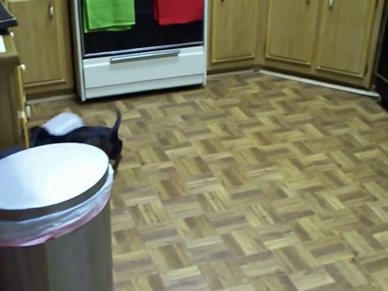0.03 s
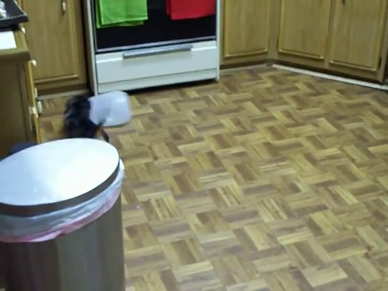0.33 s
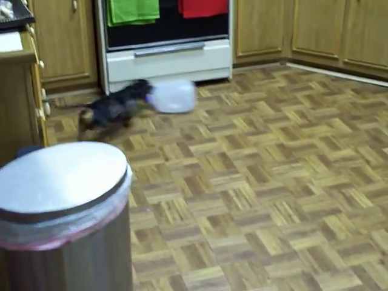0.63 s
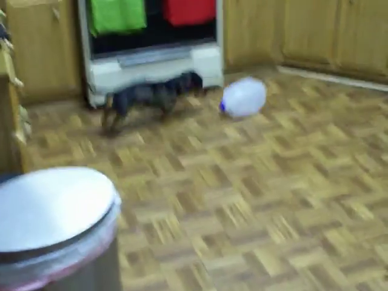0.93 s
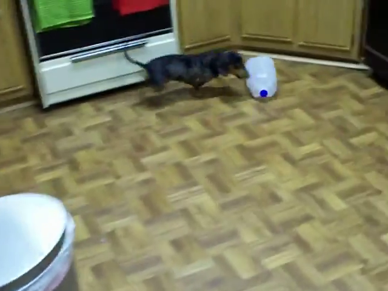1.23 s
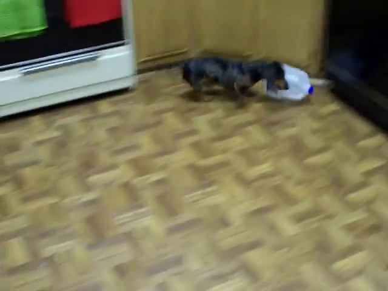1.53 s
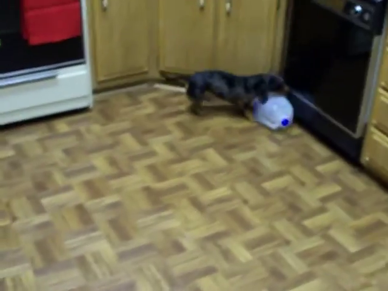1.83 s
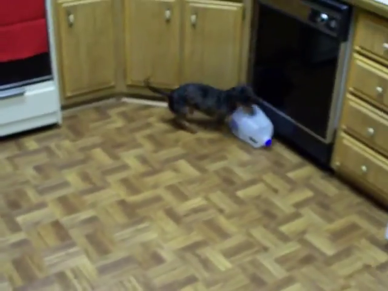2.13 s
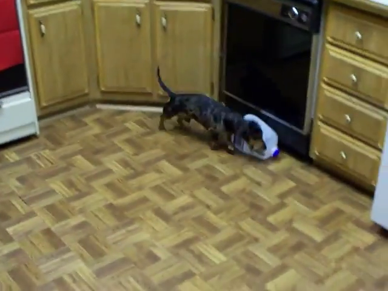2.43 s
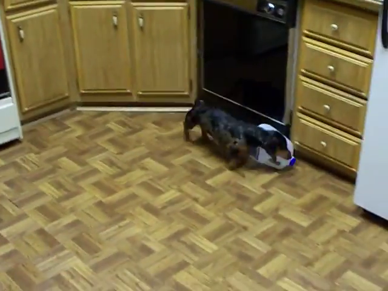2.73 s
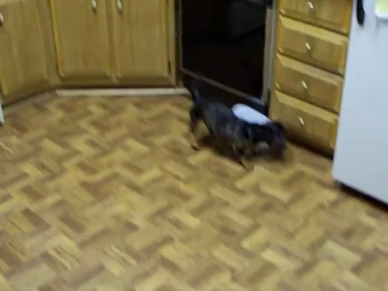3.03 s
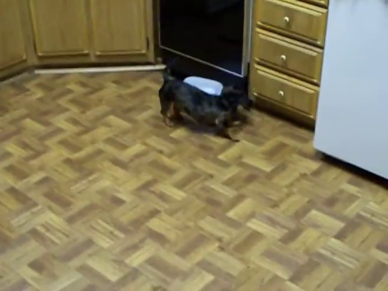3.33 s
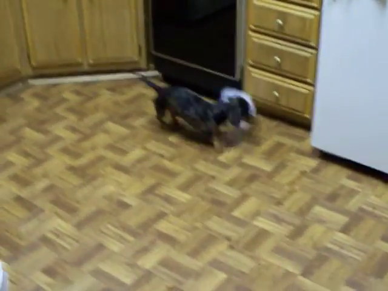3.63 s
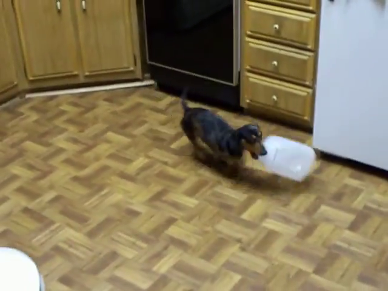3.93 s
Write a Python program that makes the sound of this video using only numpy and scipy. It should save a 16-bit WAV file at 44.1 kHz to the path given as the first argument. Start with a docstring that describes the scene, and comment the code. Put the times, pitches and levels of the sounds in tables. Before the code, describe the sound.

An empty plastic jug scrapes and rattles across a hard kitchen floor throughout, with a small dog's claws ticking lightly. Lighter knocks in the first second give way to sharper, crackly clacks from 1.3 to 1.8 seconds. After a brief lull, scraping and knocking pick up from 2.1 seconds, with deeper hollow thumps near 3.2 and 3.6 seconds, then fade by 4. The room adds a short echo.

```python
"""A kitchen with a hard floor: a small dog noses an empty plastic jug across it.
The jug slides in stick-slip shoves, tumbles and knocks against the cabinets.
Its hollow body booms; its thin walls clack and crackle. Claws tick on the floor.
The room adds faint noise and a short bright tail."""
import sys
import numpy as np
from scipy import signal
from scipy.io import wavfile

SR = 44100
rng = np.random.default_rng(int(sys.argv[2]) if len(sys.argv) > 2 else 0)


def transcribe(u):
    """Save the signal u as a 16-bit wav file named by the first command-line argument.

    u: samples, shape (n,) or (channels, n), limited to [-1, 1]; the rate is SR.
    q: integer samples, one column per channel.
    """
    v = np.clip(np.atleast_2d(u).T, -1, 1)
    q = np.round(v * 32767).astype(np.int16)
    wavfile.write(sys.argv[1], SR, q)


N = 176400
TIME_S = np.arange(N) / SR

# Room decay: f/Hz, t60/s
ROOM_DECAY = [(150, 0.19), (500, 0.55), (1400, 0.49), (3500, 0.2), (8000, 0.29)]
# Spectral shapes: f/Hz, relative level/dB
AIR_EQ = [(20, -18), (60, -14.5), (100, -4.5), (170, 2.5), (320, -2), (1600, -18.5), (3100, -7.5),
          (7300, -14.5), (9000, -34.5)]  # room noise
BODY_EQ = [(25, -56), (60, -40), (110, -37), (165, -14), (240, -4.5), (360, 2), (470, -11.5), (680, -9),
           (1500, -52.5)]  # hollow body
CLACK_EQ = [(150, -30.5), (450, -6.5), (650, 5), (1200, 3.5), (1750, 1.5), (2150, -7), (2900, -14),
            (4200, -21.5), (8000, -39.5)]  # struck wall
RASP_EQ = [(150, -30.5), (470, -5.5), (660, 4), (1250, 1.5), (1750, 0), (2150, -7.5), (2800, -11),
           (4200, -20.5), (8000, -39)]  # rubbed wall
CRACK_EQ = [(500, -30), (2000, 9.5), (3200, -0.5), (5200, -1.5), (6400, -0.5), (7400, 3.5), (8200, -4),
            (9000, -27)]  # sharp contact
HISS_EQ = [(500, -21.5), (2000, 10), (3200, 2), (5200, -1.5), (6400, 1), (7400, 5), (8200, -6), (9000, -21)]  # fine friction
MIC_EQ = [(20, 0.5), (2400, -2.5), (2900, 1), (3400, -4.5), (3800, -8.5), (4050, -15.5), (4200, -25.5),
          (4400, -13), (4700, -4.5), (5200, 1), (6000, 3.5), (9000, 1)]  # microphone
# Claw ticks: t/s, level/dB
CLAW_TICKS = [(0.226, -35.5), (0.376, -37.5), (0.671, -35.5), (0.907, -34.5), (.96, -38), (1.116, -40),
              (1.278, -37), (1.434, -33.5), (1.565, -30), (1.791, -31.5), (2.142, -46), (2.646, -28),
              (2.848, -37), (2.866, -37), (2.904, -34), (3.294, -45.5), (3.406, -39.5), (3.699, -39),
              (3.789, -36), (3.888, -48)]
# Jug modes: f/Hz, level/dB, t60/s before added damping
JUG_MODES = [(194.4, -17, 0.65), (230.5, -4, 0.23), (261.4, -0.5, 0.49), (323, -6.5, 0.17),
             (357.4, -3.5, 0.3), (386.7, 2, 0.34), (439, -2, 0.18), (548.3, -2.5, 0.22),
             (603.7, -5.5, 0.27), (711, -10, 0.41), (963, -16, 0.18), (1210, -25.5, 0.6),
             (1650, -17.5, 0.12)]
# Light sliding: t/s, rumble level/dB, rasp level/dB, hiss level/dB
LIGHT_SLIDE = [(0., -28.5, -29.5, -42.5), (.3, -46, -32.5, -42), (.42, -37, -36, -42.5),
               (.59, -50, -34, -41.5), (.72, -38, -35, -47), (.87, -49, -36.5, -43.5),
               (.96, -43.5, -41, -45), (1.1, -41, -34, -42.5), (1.2, -33, -33, -50),
               (1.32, -44, -33, -38.5), (1.52, -34.5, -34, -40.5), (1.86, -46.5, -37, -46.5),
               (1.95, -40, -34, -41.5), (2.0, -49, -52, -56), (2.08, -45, -38, -59),
               (2.18, -43, -38.5, -46), (2.26, -34.5, -42.5, -43.5), (2.46, -42, -31.5, -42),
               (2.55, -39.5, -34.5, -41.5), (2.86, -35.5, -48, -48), (3.08, -43.5, -37.5, -49),
               (3.15, -40.5, -40, -41.5), (3.37, -54, -51, -69), (3.48, -48, -46, -60),
               (3.6, -36.5, -36.5, -36), (3.76, -52, -50, -64), (3.86, -61, -58.5, -63),
               (4., -54, -44.5, -59)]
# Shoves: t/s, length/s, rumble level/dB, rasp level/dB, hiss level/dB, note f/Hz, note level/dB
JUG_SHOVES = [(0.008, 0.18, -37.5, -33, -66, 701, -36), (0.21, 0.14, -36.5, -34, -60, 690, -38),
              (0.612, 0.079, -53, -33, -39.5, 1568, -32.5), (0.743, 0.097, -37, -30.5, -42.5, 1241, -29.5),
              (0.983, 0.048, -57, -42, -38.5, 1725, -39), (1.333, 0.071, -37, -23.5, -36.5, 265, -26.5),
              (1.549, 0.021, -21, -19, -49.5, 536, -27), (1.66, 0.12, -36, -41, -38, 965, -36),
              (2.114, 0.1, -39.5, -32.5, -41, 385, -40.5), (2.269, 0.066, -39.5, -31, -32.5, 965, -37),
              (2.561, 0.13, -42.5, -24.5, -32.5, 1648, -31), (2.622, 0.12, -28.5, -23.5, -51.5, 1170, -44),
              (2.754, 0.074, -40, -29.5, -52, 259, -37), (2.946, 0.077, -32, -38, -55, 382.4, -27),
              (3.174, 0.079, -28, -39.5, -47.5, 354, -29.5), (3.243, 0.065, -33.5, -39, -51, 337, -41),
              (3.401, 0.047, -59, -36.5, -39.5, 1062, -43), (3.626, 0.063, -29.5, -48, -51, 424, -30.5),
              (3.764, 0.058, -54, -49.5, -41.5, 1900, -60)]
# Knocks: t/s, boom level/dB, clack level/dB, crack level/dB, body f/Hz, wall f/Hz, contact/s
JUG_KNOCKS = [(.078, -37, -27.5, -50, 394, 880, .012), (0.11, -34, -29.5, -59, 370, 655, 0.011),
              (.134, -27, -28.5, -55.5, 377, 646, 0.0066), (.178, -33.5, -31.5, -55, 390, 1290, 0.0066),
              (0.651, -29.5, -28, -40, 310, 1373, 0.01), (.765, -44, -23, -34, 314, 1176, 0.018),
              (.800, -44, -27, -53, 352, 1263, 0.023), (1.001, -44, -28.5, -30, 315, 1799, 0.009),
              (1.063, -45, -30.5, -45, 355, 1330, 0.012), (1.330, -49, -26, -27.5, 263, 1730, 0.011),
              (1.337, -33.5, -21.5, -38, 260, 1360, .004), (1.357, -29, -36, -32, 252, 1280, 0.014),
              (1.397, -33.5, -28.5, -30.5, 262, 1090, 0.016), (1.441, -36, -31, -22, 386, 2090, 0.0095),
              (1.552, -26, -18, -22.5, 397, 976, 0.008), (1.573, -32.5, -24, -41, 432, 746, 0.016),
              (1.622, -25, -34, -48, 418, 640, 0.0094), (1.672, -29.5, -23, -39.5, 405, 964, 0.0093),
              (1.699, -39.5, -28, -50, 396, 784, 0.0085), (1.754, -39, -25.5, -40, 402, 1810, 0.0035),
              (1.760, -35.5, -20.5, -47, 390, 1278, 0.0021), (2.012, -35.5, -33.5, -47, 403, 1850, 0.007),
              (2.065, -35, -38, -53, 395, 960, 0.014), (2.085, -46, -34, -50, 379, 990, .012),
              (2.099, -39.5, -35.5, -31.5, 384, 1785, 0.0026), (2.102, -39, -22.5, -34, 383, 1840, 0.0028),
              (2.284, -30.5, -18.5, -40.5, 378, 682, 0.0082), (2.338, -32.5, -21, -47, 355, 723, 0.007),
              (2.593, -31, -30, -31, 254, 1550, 0.01), (2.684, -36, -20, -44.5, 433, 1094, 0.022),
              (2.726, -30, -23.5, -37, 350, 1161, 0.0069), (2.806, -33, -35, -46, 260, 1246, 0.0089),
              (2.917, -32.5, -26, -41, 350, 1720, 0.01), (2.932, -27.5, -26.5, -36, 352, 660, 0.0084),
              (2.965, -29.5, -21.5, -44, 390, 734, 0.006), (3.028, -27.5, -30.5, -50, 350, 1277, 0.014),
              (3.157, -23, -36.5, -38, 330, 853, 0.0087), (3.160, -21.5, -27.5, -46, 336, 770, 0.0056),
              (3.235, -22.5, -25, -35, 293, 650, 0.011), (3.256, -31, -28, -42, 332, 614, 0.0048),
              (3.573, -32.5, -30.5, -34.5, 260, 1634, 0.0085), (3.616, -18.5, -24, -28, 421, 523, 0.0064)]


def amp(db):
    """dB to gain."""
    return 10 ** (np.asarray(db) / 20)


def unit_rms(x):
    """Scale to rms 1."""
    return x / np.sqrt(np.mean(x ** 2) + 1e-20)


def lookup(table, hz):
    """Interpolate over log frequency."""
    table_hz, value = np.transpose(table)
    return np.interp(np.log(hz + 1), np.log(table_hz + 1), value)


def add(mix, at_s, sound):
    """Mix in place."""
    part = mix[max(round(at_s * SR), 0):][:len(sound)]
    part += sound[:len(part)]


def impulse(eq, size=4096):
    """Minimum-phase impulse response, energy 1."""
    log_gain = np.log(amp(lookup(eq, abs(np.fft.fftfreq(size, 1 / SR)))))
    spectrum = np.exp(np.conj(signal.hilbert(log_gain)))
    ir = np.fft.ifft(spectrum).real[:size // 2]
    return ir / np.linalg.norm(ir)


def convolve(x, ir):
    """Filter, keeping the length."""
    return signal.fftconvolve(x, ir)[:len(x)]


def at_level(x, db):
    """Scale to the energy of 15 ms at db."""
    return x / np.linalg.norm(x) * amp(db) * np.sqrt(.015 * SR)


def contact(noise, fade_s, eq, db, jolt):
    """One contact: a first jolt, then chatter that builds and quickly dies."""
    age = TIME_S[:len(noise)] / fade_s
    chatter = noise * np.exp(-age) * (1 - np.exp(-age / 0.36))
    chatter /= np.linalg.norm(chatter)
    chatter[0] += jolt
    return at_level(convolve(chatter, impulse(eq)), db)


def room_noise(level_db=-53):
    """Faint steady air."""
    return amp(level_db) * convolve(rng.standard_normal(N), impulse(AIR_EQ))


def room_echoes(x, onset_s=0.002, spacing_samples=12):
    """Dense reflections off floor and cabinets; each band has its own decay."""
    taps = np.zeros(SR // 2)
    slots = np.arange(0, len(taps) - spacing_samples, spacing_samples)
    taps[slots + rng.integers(0, spacing_samples, len(slots))] = rng.choice([-1, 1], len(slots))
    taps *= np.minimum(TIME_S[:len(taps)] / onset_s, 1) ** 2
    hz, t, bands = signal.stft(taps, SR, nperseg=256)
    decay = amp(-60 * t / lookup(ROOM_DECAY, hz)[:, None])
    tail = signal.istft(bands * decay, SR)[1]
    return convolve(x, tail / np.linalg.norm(tail))


def moving_echoes(x, steps=24):
    """Jug and microphone travel: one echo pattern crossfades into the next."""
    out, hop = np.zeros(N), N // steps
    for centre in range(0, N + hop, hop):
        span = np.arange(max(centre - hop, 0), min(centre + hop, N))
        part = x[span] * np.cos(np.pi / 2 * (span - centre) / hop)
        add(out, span[0] / SR, room_echoes(np.pad(part, (0, SR // 2))))
    return out


def claws(contact_s=0.008):
    """Claws strike the hard floor: short bright ticks."""
    ticks = np.zeros(N)
    for at_s, db in CLAW_TICKS:
        noise = rng.standard_normal(SR // 10)
        add(ticks, at_s, contact(noise, contact_s, CRACK_EQ, db - 1, jolt=0.11))
    return ticks


def stick_slip(rate_hz, spread_db, flutter_db):
    """Random train of tiny uneven jolts, bunched into rattles."""
    flutter_band = signal.butter(2, [12, 70], "band", fs=SR, output="sos")
    flutter = unit_rms(signal.sosfilt(flutter_band, rng.standard_normal(N)))
    size_db = spread_db * np.minimum(rng.exponential(1, N), 3) + flutter_db * np.clip(flutter, -2, 2)
    slips = rng.random(N) < rate_hz / SR
    return unit_rms(slips * rng.choice([-1, 1], N) * amp(size_db))


def jug_ring(damping, note_hz=380, boost_db=0, width_hz=35):
    """Body modes, energy 1; the contact point favours those near note_hz."""
    t = TIME_S[:SR // 2]
    ring = np.zeros(len(t))
    for k, (hz, db, t60_s) in enumerate(JUG_MODES):
        start_db = db + boost_db * np.exp(-((hz - note_hz) / width_hz) ** 2)
        ring += (-1) ** k * amp(start_db - 60 * t * damping / t60_s) * np.sin(2 * np.pi * hz * t)
    return ring / np.linalg.norm(ring)


def rubbed_note(drive, hz):
    """Rubbing brings out one broad resonance; energy 1."""
    peak = signal.iirpeak(hz, hz / (25 + hz / 22), fs=SR)
    note = signal.lfilter(*peak, signal.lfilter(*peak, drive))
    return note / np.linalg.norm(note)


def jug_scrape(attack_share=0.15, release_s=0.024):
    """The jug judders over the floor: slips drive body, walls, hiss and one note per shove."""
    judder = stick_slip(rate_hz=1000, spread_db=4.5, flutter_db=2.2)
    grit = stick_slip(rate_hz=1500, spread_db=4, flutter_db=2.5)
    times_s, *slide_db = np.transpose(LIGHT_SLIDE)
    power = np.array([amp(np.interp(TIME_S, times_s, db) + 0.44) ** 2 for db in slide_db])
    notes = np.zeros(N)
    for at_s, length_s, *bands_db, note_hz, note_db in JUG_SHOVES:
        attack = np.clip((TIME_S - at_s) / (attack_share * length_s), 0, 1)
        envelope = attack * np.exp(-np.maximum(TIME_S - at_s - length_s, 0) / release_s)
        power += (amp(bands_db)[:, None] * envelope) ** 2
        notes += amp(note_db) * np.linalg.norm(envelope) * rubbed_note(judder * envelope, note_hz)
    rumble_gain, rasp_gain, hiss_gain = np.sqrt(power)
    rumble = amp(-8.5) * convolve(judder * rumble_gain, impulse(BODY_EQ))
    ring = amp(-4) * convolve(judder * rumble_gain, jug_ring(damping=1.34))
    rasp = amp(-2.5) * convolve(judder * rasp_gain, impulse(RASP_EQ))
    hiss = amp(-1.5) * convolve(grit * hiss_gain, impulse(HISS_EQ))
    return rumble + ring + rasp + hiss, notes


def jug_knocks(wall_t60_s=0.042):
    """Each knock cracks, clacks at the struck wall's pitch and sets the body booming."""
    hits, ring = np.zeros((2, N))
    t = TIME_S[:SR // 6]
    for at_s, boom_db, clack_db, crack_db, body_hz, wall_hz, contact_s in JUG_KNOCKS:
        boom_noise, clack_noise, crack_noise = rng.standard_normal((3, len(t)))
        add(hits, at_s, contact(clack_noise, contact_s, CLACK_EQ, clack_db - 3.76, jolt=0.2))
        add(hits, at_s, contact(crack_noise, 0.64 * contact_s, CRACK_EQ, crack_db - 2, jolt=0.14))
        add(hits, at_s, contact(boom_noise, 1.84 * contact_s, BODY_EQ, boom_db - 2.5, jolt=0.3))
        attack = 1 - np.exp(-t / (0.5 * contact_s))
        wall = np.sin(2 * np.pi * wall_hz * t) * amp(-60 * t / wall_t60_s) * attack
        add(ring, at_s, at_level(wall, clack_db - 2.5))
        body = jug_ring(damping=1.13, note_hz=body_hz, boost_db=11)
        add(ring, at_s, at_level(body, boom_db + 0.3))
    return hits, ring


def scene():
    """Jug and claws with their echoes, over room noise; mono."""
    hits, ring = jug_knocks()
    scrape, notes = jug_scrape()
    impacts = hits + claws()
    tones = ring + notes
    air = room_noise()
    echoes = moving_echoes(amp(0.38) * impacts + amp(-2) * scrape + amp(-14.5) * tones)
    return (air + echoes + scrape + tones + impacts)[None]


def record(dry, cutoff_hz=8850):
    """Small microphone with a deep notch near 4 kHz, then a low-pass."""
    mic = impulse(MIC_EQ)
    coloured = convolve(dry[0], mic / abs(mic.sum()))  # unity gain at DC
    lowpass = signal.firwin(401, cutoff_hz, window=("kaiser", 8), fs=SR)
    return signal.fftconvolve(coloured, lowpass, "same")[None]


dry = scene()
out = record(dry)
transcribe(out)
```